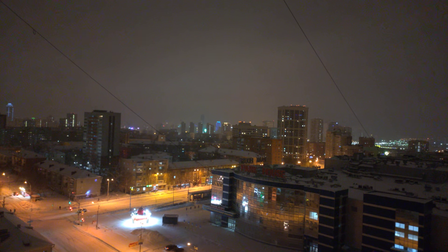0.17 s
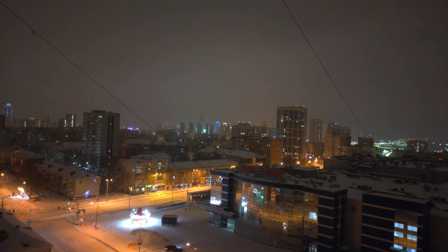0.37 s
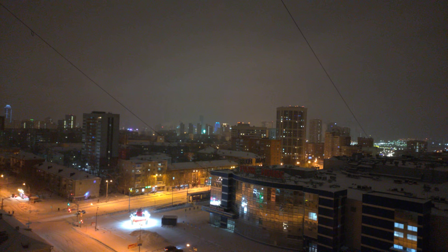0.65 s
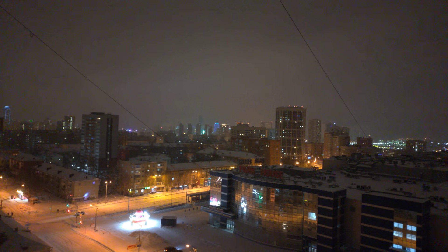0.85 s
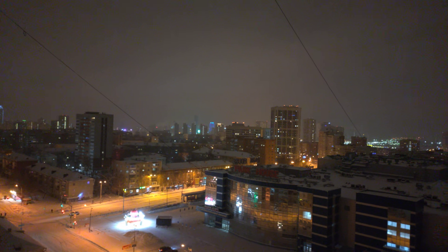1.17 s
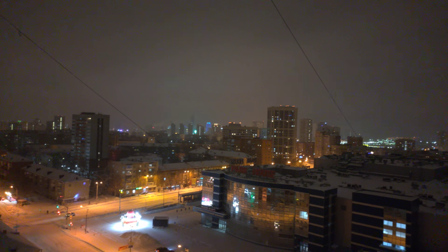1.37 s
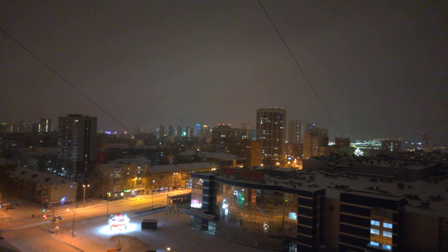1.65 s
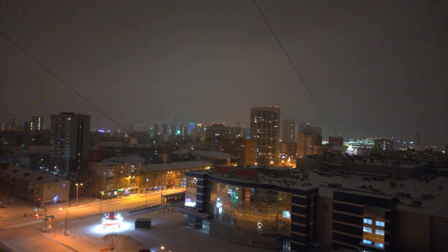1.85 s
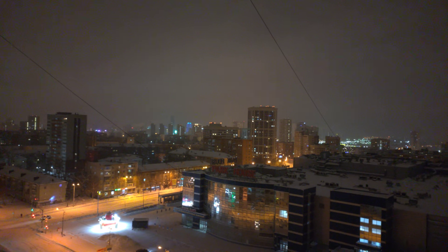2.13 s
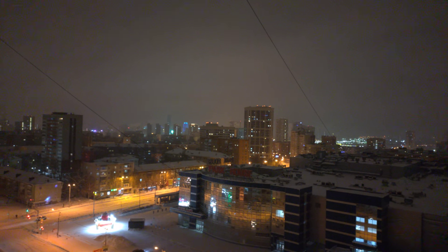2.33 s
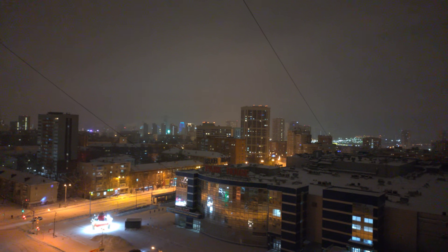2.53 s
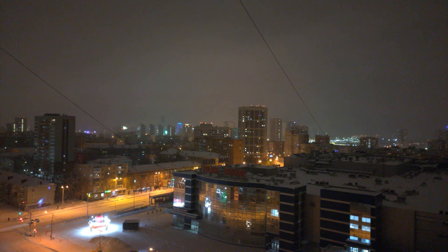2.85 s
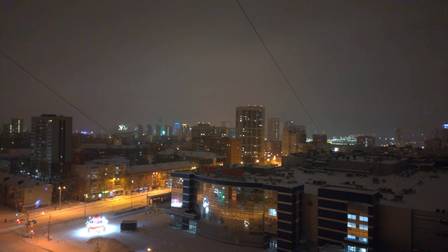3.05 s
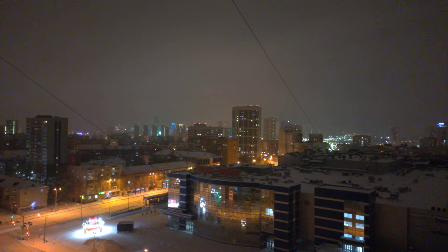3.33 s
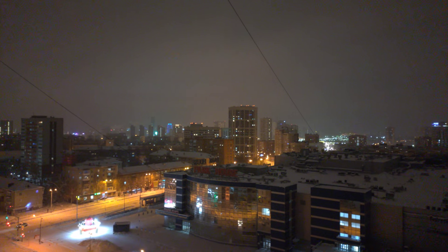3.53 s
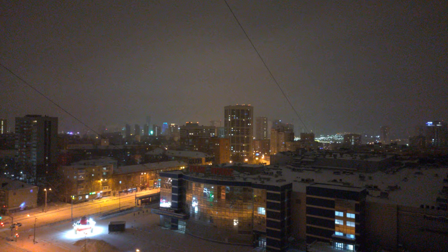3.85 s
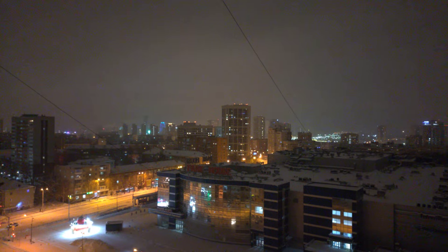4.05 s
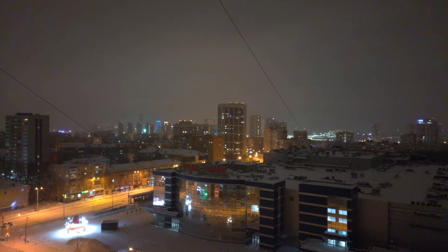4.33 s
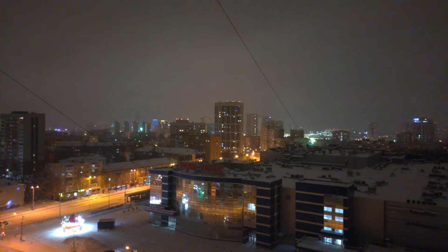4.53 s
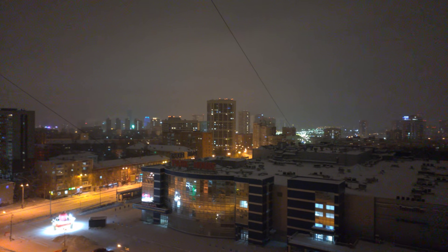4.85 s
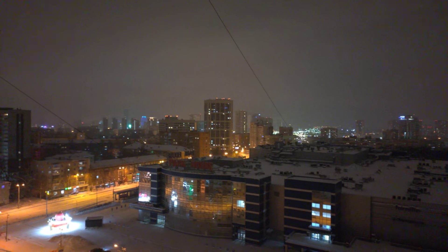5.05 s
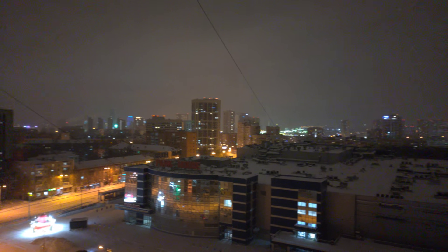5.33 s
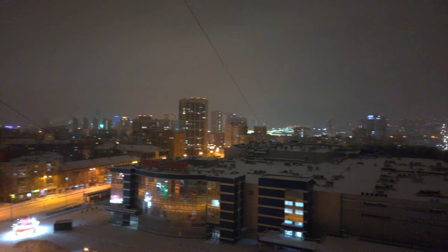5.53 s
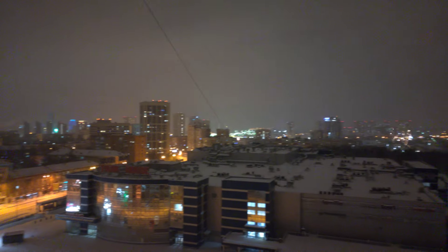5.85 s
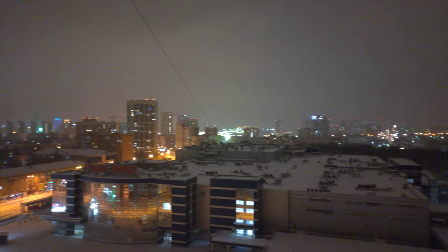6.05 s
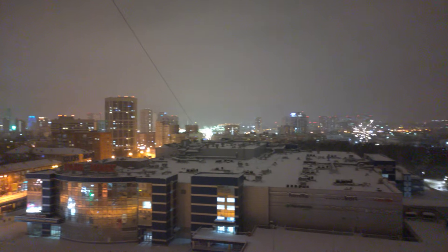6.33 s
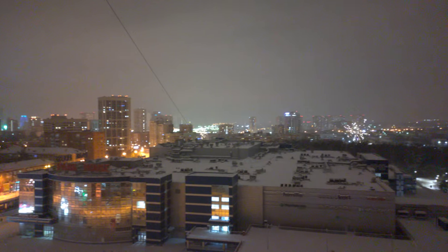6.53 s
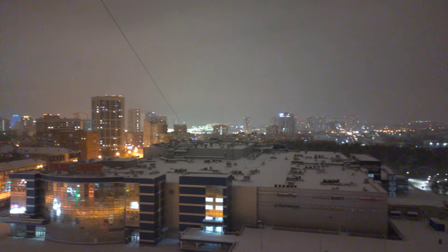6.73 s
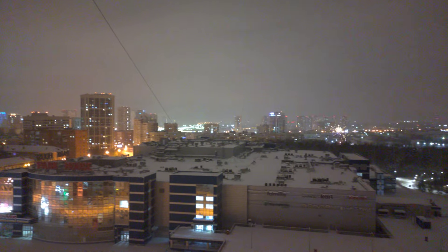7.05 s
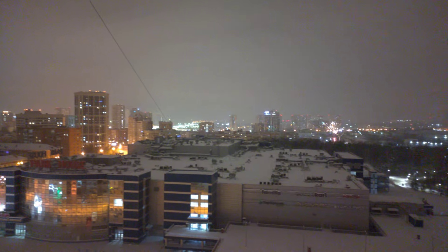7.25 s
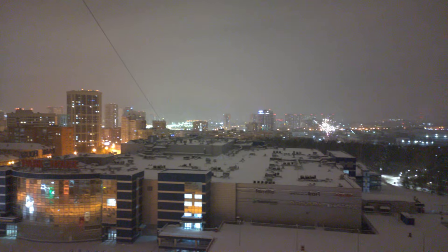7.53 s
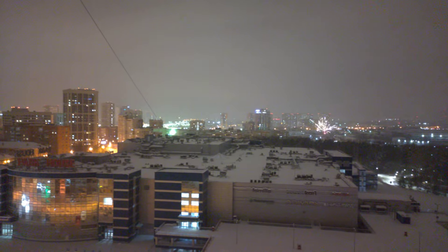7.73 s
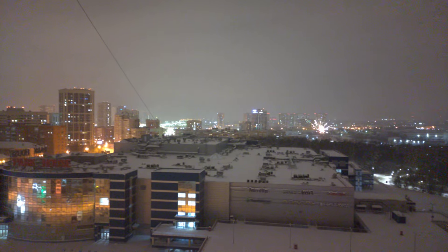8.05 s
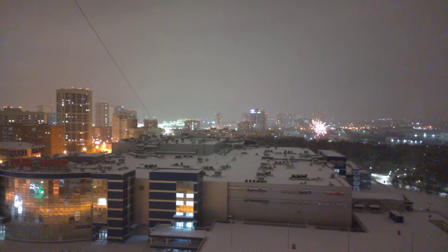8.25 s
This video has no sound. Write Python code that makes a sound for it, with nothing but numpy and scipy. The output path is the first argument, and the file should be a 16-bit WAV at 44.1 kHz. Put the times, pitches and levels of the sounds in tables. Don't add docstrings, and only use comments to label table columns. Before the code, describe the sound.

Irregular distant firework blasts over an open city, mostly muffled low-mid booms with short scattered echoes and a soft rolling tail. Sparse at first, with tiny handling-like rustles close by, they gain sharp rapid reports around three, four and a half and six seconds, then crowd together in deep thuds until the cut. Wide outdoor stereo from a small camera, treble dulled by distance, quiet street hiss underneath.

```python
import sys
import numpy as np
from scipy import signal
from scipy.fft import rfft, irfft, next_fast_len
from scipy.io import wavfile
from scipy.ndimage import uniform_filter1d

SR = 44100
rng = np.random.default_rng(int(sys.argv[2]) if len(sys.argv) > 2 else 0)


def amplitude_ratio(level_db):
    exponent = np.asarray(level_db, float) / 20
    return 10 ** exponent


def to_wav(sig):
    pcm = np.clip(np.atleast_2d(sig), -1, 1) * 32767
    pcm = np.round(pcm).astype(np.int16)
    wavfile.write(sys.argv[1], SR, pcm.T)


N = 369558
SIZE = next_fast_len(N + SR)
HZ = np.arange(SIZE // 2 + 1) * SR / SIZE

# start in seconds, level in dB, brightness in dB, last echo in dB.
SALVOS = [
    (2.6601, -10, -3.5, -1),
    (3.1151, -10, -5.5, 2.5),
    (4.626, -11, -0.5, -14.5),
    (5.8215, -10, -1.5, -2.5),
    (8.1271, -9, -2.5, -10.5),
]
# frequency in Hz, likeness from 0 to 1, left minus right in dB, left lead in radians.
PORT_PAIR = [(60, 1, 5.5, 0.55), (194, 0.98, 5.5, 0.42), (560, 0.63, 4.5, 0.64), (960, 0.12, 4.5, 4.15),
             (1250, 0.33, 3.5, 3.5), (1740, 0.6, 0.5, 4.3), (2040, 0.3, 0, 5.3), (3000, 0.12, 0.5, 8.7),
             (4860, 0, -2.5, 18.5), (8900, 0.5, -8, 20.5), (12200, 0.1, 5.5, 32)]


def on_hz(table, column=1):
    table = np.array(table)
    return np.interp(np.log(HZ + 1), np.log(table[:, 0]), table[:, column])


def on_time(table):
    s, *columns = np.transpose(table)
    return [np.interp(np.arange(N) / SR, s, c) for c in columns]


def unit(x):
    return x / np.sqrt(np.mean(x ** 2))


def filtered(x, gain):
    return irfft(gain * rfft(x, SIZE), SIZE)[..., :N]


def causal(gain):
    cepstrum = irfft(np.log(gain + 1e-4 * gain.max()), SIZE)
    cepstrum[1:SIZE // 2] *= 2
    cepstrum[SIZE // 2 + 1:] = 0
    return np.exp(rfft(cepstrum))


def decay(t, t60):
    return np.exp(-np.log(1000) * t / t60)


def swell(s, length, rise, fade):
    gain, i = np.zeros(N), int(max(s, 0) * SR)
    t = np.arange(min(N - i, int((length + 9 * fade) * SR))) / SR
    gain[i:i + len(t)] = np.minimum(t / rise, 1) * np.exp(-np.maximum(t - length, 0) / fade)
    return gain


def walk(rate):
    k = int(SR / rate)
    held = np.repeat(rng.standard_normal(N // k + 1), k)
    return 0.87 * uniform_filter1d(uniform_filter1d(held, k), k)[:N]


def pops(rate, scatter_db):
    hit, size, sign = rng.random((3, 2, N))
    height = amplitude_ratio(-scatter_db * np.log(size + .02))
    return unit((hit < rate / SR) * height * np.sign(sign - .5))


def grainy(pop_share, pop_rate, lump_rate):
    noise = rng.standard_normal((2, N)) + pop_share * pops(pop_rate, 3.0)
    return noise * amplitude_ratio(walk(lump_rate))


def bands():
    # frequency in Hz, level in dB per Hz.
    air_colour = [(25, -21), (90, -14.5), (180, -0.5), (300, -1), (600, -10), (900, -16.5), (1400, -20.5),
                  (1700, -25.5), (3050, -39), (3300, -43), (6500, -53), (8300, -50), (9300, -57),
                  (10200, -67.5), (15500, -74.5)]
    edges_hz = (450, 950, 4800)
    low, mid, high = (1 / (1 + (HZ / edge) ** 6) for edge in edges_hz)
    shares = [low, (1 - low) * mid, (1 - mid) * high, 1 - high]
    return amplitude_ratio(on_hz(air_colour)) * np.sqrt(shares)


def levels():
    # time in seconds, strength in dB, nearness in dB that lifts its top.
    barrage_levels = [(0, -32, 4.5), (.4, -30.5, -6.5), (.8, -29.5, 0.5), (1.2, -31.5, -2.5),
                      (1.9, -29.5, -7.5), (2.4, -30.5, 0.5), (2.9, -31, 0.5), (3.5, -29, 4),
                      (3.9, -29, 2.5), (4.3, -29, -1), (5, -29, 0.5), (5.5, -30, 1), (6.2, -30.5, 0),
                      (6.7, -27, 0), (7.1, -30, 0.5), (7.5, -31, -2), (8, -26.5, -6.5), (8.38, -28, 5)]
    # start in seconds, length in seconds, level in dB, brightness in dB.
    washes = [
        (0.802, 0.11, -26.5, 13.5),
        (2.359, 0.13, -21.5, 7),
        (3.189, 0.055, -21, 16.5),
        (3.586, 0.14, -19.5, -6),
        (4.782, 0.092, -11, 4.5),
        (4.928, 0.06, -21.5, 11),
        (5.244, 0.14, -14, 1.5),
        (5.99, 0.061, -15, -8),
        (6.662, 0.046, -12.5, 1.5),
    ]
    # start in seconds, length in seconds, level in dB, its share lower down in dB.
    rustles = [(0, 0.012, -68.5, 7), (0.043, 0.11, -68, 4.5), (0.446, 0.11, -70.5, 6.5),
               (0.165, .28, -86.5, 13.5), (.5, .42, -81.5, 13), (3.2, 0.17, -81, 9), (0.589, .04, -69, 2),
               (0.724, 0.056, -78.5, 11), (0.945, 0.007, -51.5, -4), (0.967, 0.11, -77, 9.5),
               (1.09, 0.047, -83.5, 17), (1.138, 0.21, -95.5, 26.5), (1.33, 1.97, -94.5, 23),
               (3.023, 0.052, -81, 11), (3.38, .52, -72, 0.5), (3.602, 0.11, -71, 0),
               (3.519, 0.014, -68.5, -1), (3.773, 0.083, -76.5, 6), (4.84, 0.021, -75.5, 12),
               (5.433, 0.14, -85, 17), (5.668, 0.022, -90, 23), (6.638, 0.011, -90.5, 23),
               (6.829, 0.01, -81.5, 16), (7.447, 0.013, -84.5, 15.5), (7.817, 0.0083, -79.5, 16.5)]
    db, near = on_time(barrage_levels)
    power = amplitude_ratio(2 * np.array([db, db - 21 + near, .5 * db - 58.5 + 0.25 * near, 0 * db - 91.5]))

    wash_db = (-17, -36, -62.5, -76.5)
    rise_s = 0.025
    glows = [(s + 0.044, rise_s, db, bright, 0.37) for s, db, bright, _ in SALVOS]
    for s, length, shot_db, bright, fade in glows + [(*row, .06) for row in washes]:
        wash = swell(s, length, rise_s, fade)
        lift = shot_db + np.array(wash_db) + bright * np.array([0, 1, 1, 1])
        power += (amplitude_ratio(lift)[:, None] * wash) ** 2

    ragged_db = 2.0 * walk(160)
    for s, length, top_db, low_db in rustles:
        rustle = amplitude_ratio(top_db + ragged_db * min(length / 0.059, 1))
        rustle = rustle * swell(s, length, 0.2 * min(length, .3), 0.03)
        power[-2:] += (rustle * amplitude_ratio(np.array([[low_db], [0]]))) ** 2
    return np.sqrt(power)


def barrage():
    boom, knock, crack, snap = bands()
    rumble_gain, roar_gain, crackle_gain, rustle_gain = levels()
    rumble = grainy(.6, 120, 14) * amplitude_ratio(1.5 * walk(35))
    roar, crackle, rustle = grainy(.3, 200, 12), grainy(.4, 300, 18), pops(2600, 3.9)
    roar_colour = crack * (1 + 0.13 * np.exp(-((HZ - 2600) / 700) ** 2))
    rustle_colour = 1 / (1 + (7500 / (HZ + 1)) ** 6) / (1 + (HZ / 9500) ** 5)
    rustle_colour *= 1 + 0.55 * np.exp(-((HZ - 8400) / 600) ** 2)
    out = rumble_gain * amplitude_ratio(2.5) * unit(filtered(rumble, boom + knock))
    out += roar_gain * amplitude_ratio(5.0) * unit(filtered(roar, roar_colour))
    out += crackle_gain * amplitude_ratio(5.0) * unit(filtered(crackle, snap))
    return out + rustle_gain * amplitude_ratio(5.5) * unit(filtered(rustle, rustle_colour))


def tyres():
    # time in seconds, level in dB.
    hiss_levels = [
        (0, -64),
        (.6, -58),
        (1.5, -68),
        (2.4, -68.5),
        (3.6, -61.5),
        (5, -66),
        (6.3, -66),
        (7.2, -71),
        (8.38, -68),
    ]
    low_hz, high_hz = 2300, 3180
    colour = 1 / np.sqrt((1 + (low_hz / (HZ + 1)) ** 6) * (1 + (HZ / high_hz) ** 40))
    return amplitude_ratio(on_time(hiss_levels)[0]) * unit(filtered(grainy(.4, 300, 18), colour))


def wind():
    # start in seconds, length in seconds, level in dB.
    sub_swells = [
        (2.554, 0.66, -45),
        (6.004, 0.65, -47.5),
        (6.98, 0.49, -58.5),
    ]
    slew_s = 0.13
    gain = amplitude_ratio(-55) + sum(amplitude_ratio(db) * swell(s, length, slew_s, slew_s) for s, length, db in sub_swells)
    noise = rng.standard_normal((2, N)) * amplitude_ratio(4.0 * walk(3.9))
    return gain * unit(filtered(noise, 1 / (1 + (HZ / 95) ** 4)))


def bangs():
    # start in seconds, boom in dB, knock in dB, crack in dB.
    reports = [(0.2705, -12, -14, -21), (1.827, -17.5, -20, -23.5), (2.272, -8.5, -9.5, -30),
               (2.321, -32.5, -21.5, -35), (2.841, -27.5, -28, -36), (2.889, -21, -29, -35),
               (3.096, -12, -14, -20.5), (2.061, -18.5, -25.5, -34.5), (3.524, -16, -41, -41),
               (3.639, -15.5, -36, -42), (4.728, -23.5, -9, -22), (5.274, -11.5, -31, -32),
               (5.538, -4, -10, -34.5), (5.585, -16, -13.5, -28), (6.14, -12, -10.5, -23.5),
               (6.574, -2.5, -10.5, -15), (6.832, -15, -26.5, -32), (7.395, -21, -51, -31.5),
               (7.563, -11.5, -12, -26.5), (8.182, -9, -31, -30)]
    # start in seconds, boom in dB, knock in dB, crack in dB.
    hidden = [
        (3.246, -12, -40, -31.5),
        (4.793, -26, -17.5, -18),
        (4.92, -23, -39, -25.5),
        (5.996, -25, -32, -25),
        (6.381, -9, -15.5, -17.5),
        (7.386, -10, -7, -18),
        (7.52, 2.5, -10, -17.5),
        (7.82, 1.5, -9, -16),
        (8.295, -23, -38, -31.5),
    ]
    # start in seconds, boom in dB, knock in dB.
    thumps = [(0.341, -21, -46), (0.439, -16.5, -26.5), (0.503, -29, -24), (0.616, -18, -27.5),
              (0.715, -17.5, -21.5), (1.19, -16.5, -31), (1.344, -21, -42), (1.627, -22.5, -30),
              (1.889, -13, -26), (1.944, -14.5, -29), (2.522, -20, -45), (3.416, -21.5, -24.5),
              (3.785, -16.5, -33.5), (4.503, -18, -40), (4.565, -18, -43), (4.595, -16, -22),
              (5.336, -19.5, -24), (7.076, -10, -20.5), (7.256, -5.5, -15), (7.495, -11, -22),
              (7.671, -21, -24.5), (7.719, -25.5, -44), (7.769, -23.5, -29), (7.963, -26.5, -29),
              (8.071, -12, -15), (8.21, -9, -31), (5.868, -10.5, -23)]
    # delay in seconds, boom in dB, knock in dB, crack in dB, snap in dB.
    paths = [
        (0, 3, -6, -7, -33),
        (0.0256, 4.5, -7.5, -6.5, -32),
        (0.049, 0.5, -4.5, -11, -19.5),
        (.074, 2, -28, -32.5, -37),
    ]
    path_t60_s = (.05, 0.12, 0.2, 0.21)
    path_blocked = (0, 0, 1, 1)
    rows = []
    for blocked, table in enumerate((reports, hidden)):
        for s, boom, knock, crack in table:
            snap = -56 + .5 * (crack + 25)
            rows.append((s, boom, knock, crack, snap, 0.18, blocked))
    for s, boom, knock in thumps:
        rows.append((s, boom, knock, boom - 31, boom - 51.5, 0.16, 0))
    for s, db, bright, last in SALVOS:
        for (late, boom, knock, crack, snap), t60, blocked in zip(paths, path_t60_s, path_blocked):
            up = db + last * (late == paths[-1][0])
            rows.append((s + late, up + boom, up + knock, db + crack + bright, db + snap + bright, t60, blocked))
    return rows


def blasts():
    shock_s = (.003, .001, .0002, .00005)
    rise_s = (.004, 0.00408, 0.00149, 0.0015)
    bright = (0.056, -0.13, -0.63, -1.32)
    scatter_db, fade_share = (-9, -2, -7, -5.5), (1, 0.55, 0.9, 1)
    town_db, town_t60_s = (-21, -19.5, -20.5, -18.5), 0.88
    build_s, blocked_db = 0.0077, -7
    out, walls = 0, pops(4000, 2.64)
    t, long = np.arange(SR // 4) / SR, np.arange(SR) / SR
    for band, colour in enumerate(bands()):
        shock = np.where(t < shock_s[band], 1 - 2 * t / shock_s[band], 0)
        response = causal(colour * (HZ / 1000 + 0.41) ** bright[band]) * rfft(shock, SIZE)
        pulse = irfft(response, SIZE)
        peak = np.abs(pulse).max()
        response = response / peak * amplitude_ratio(-1.5)
        energy = np.sqrt(np.sum(pulse ** 2)) / peak
        train, fronts = np.zeros((2, N + len(t))), np.zeros(N)
        for s, *db, t60, blocked in bangs():
            i, size = int((s + rise_s[band]) * SR), amplitude_ratio(min(db[band], -4))
            fade = decay(t, max(t60, .02) * fade_share[band]) + 0.15 * np.exp(-t / 0.00063)
            echoes = np.take(walls, np.arange(len(t)) + i + band * SR, axis=1, mode="wrap")
            echoes = echoes * fade * amplitude_ratio(scatter_db[band]) / energy
            echoes *= np.minimum(t / build_s, 1) ** blocked
            echoes[0, 0] = 0.67 * amplitude_ratio(blocked_db * blocked)
            train[:, i:i + len(t)] += size * echoes
            fronts[i] += size
        roll = rng.standard_normal((2, SR)) * decay(long, town_t60_s) * np.minimum(long / 0.03, 1)
        town = rfft(fronts, SIZE) * rfft(roll, SIZE) * amplitude_ratio(town_db[band]) / energy
        out = out + response * (rfft(train, SIZE) + town)
    return irfft(out, SIZE)[:, :N]


def patches(table, width, kick=3.96):
    out, t = np.zeros((2, N + SR // 4)), np.arange(SR // 4) / SR
    top_hz = .45 * SR
    for (s, hz, db, t60), noise in zip(table, rng.standard_normal((len(table), 2, SR // 4))):
        edges = [hz * (1 - width), min(hz * (1 + width), top_hz)]
        push = noise * decay(t, max(t60, .008))
        push[0, 0] = kick / np.sqrt(width * hz / 2000)
        burst = signal.sosfilt(signal.butter(2, edges, "band", fs=SR, output="sos"), push)
        dulling = signal.butter(2, min(2 * hz, top_hz), fs=SR, output="sos")
        burst = signal.sosfilt(dulling, burst)
        out[:, int(s * SR):int(s * SR) + len(t)] += amplitude_ratio(db) * burst / np.abs(burst).max()
    return out[:, :N]


def dull_booms():
    # start in seconds, peak in dB, centre in Hz, t60 in seconds.
    booms = [(0.268, -13, 193.5, 0.12), (0.346, -21, 233, 0.19), (0.44, -21.5, 191, 0.14),
             (0.503, -16, 237, 0.082), (0.675, -11.5, 301, 0.36), (0.721, -14, 203, 0.17),
             (1.188, -18.5, 184, 0.14), (1.343, -15, 280, 0.13), (1.795, -19, 179, 0.13),
             (1.827, -18.5, 193, 0.12), (1.892, -22, 321, 0.069), (2.274, -6, 367, 0.14),
             (2.521, -25.5, 205, 0.15), (2.686, -7.5, 256, 0.17), (2.922, -21, 250, 0.13),
             (3.141, -8.5, 236, 0.18), (3.415, -21, 194, 0.14), (3.502, -22, 195, 0.18),
             (3.607, -16.5, 189, 0.096), (3.643, -9.5, 251, 0.13), (3.739, -10, 312, 0.1),
             (3.804, -15.5, 284, 0.14), (4.165, -17, 312, 0.16), (4.458, -16.5, 190, 0.11),
             (4.506, -7.5, 253, 0.1), (4.654, -3, 341, 0.18), (4.756, -6.5, 346, 0.16),
             (5.035, -16.5, 251, 0.13), (5.107, -23.5, 270, 0.11), (5.206, -20.5, 242, 0.14),
             (5.336, -14, 229, 0.14), (5.542, -0.5, 294, 0.086), (5.592, -17, 220, 0.098),
             (5.848, -13.5, 313, 0.22), (6, -14.5, 181, 0.14), (6.139, -8.5, 380, 0.068),
             (6.385, -11.5, 353, 0.13), (6.575, -8, 304, 0.16), (6.885, -21, 240, 0.098),
             (7.078, -10, 182, 0.13), (7.262, -9, 229, 0.17), (7.503, -8.5, 307, 0.19),
             (7.673, -17, 307, 0.12), (7.723, -21.5, 212, 0.14), (7.77, -15.5, 230, 0.2),
             (7.826, -8.5, 257, 0.32), (8.076, -6.5, 241, 0.18), (8.154, -2.5, 294, 0.14)]
    return patches([(s, hz, db - 4, t60) for s, db, hz, t60 in booms], 0.18)


def shock_fronts():
    # start in seconds, centre in Hz, peak in dB, t60 in seconds.
    bare_fronts = [(.2713, 2780, -42, 0.02), (.9492, 10900, -36.5, .03), (1.8282, 3200, -44, .03),
                   (2.6609, 4000, -40, .015), (3.0964, 3000, -40, 0.023), (3.1158, 4000, -44, .015),
                   (3.1393, 4000, -37, .015), (4.6272, 5000, -36, .012), (4.651, 4000, -24, 0.013),
                   (4.678, 5500, -36.5, 0.018), (5.8227, 3000, -31.5, 0.012), (5.848, 4460, -34.5, 0.014),
                   (5.8745, 4500, -35.5, .02), (6.1424, 2500, -32, 0.025), (7.563, 4000, -34, 0.027),
                   (8.1289, 2800, -40, 0.01), (8.1529, 3180, -36, .02), (8.1808, 4000, -28.5, 0.024),
                   (8.1903, 3020, -23.5, 0.017)]
    return patches(bare_fronts, 0.31)


def street_rings():
    # start in seconds, centre in Hz, peak in dB, t60 in seconds.
    rings = [(.273, 960, -23, .15), (.272, 2000, -46, 0.11), (1.829, 1510, -30.5, .12),
             (1.829, 3800, -38, .1), (1.947, 588, -22.5, 0.062), (2.325, 710, -38, 0.13),
             (2.661, 2280, -33, 0.05), (2.7, 2300, -34, 0.23), (3.097, 980, -19, 0.3),
             (3.17, 331, -14, 0.32), (3.14, 1870, -34, 0.34), (3.25, 3700, -39, .15),
             (4.461, 326, -21, 0.08), (4.595, 600, -32, 0.067), (5.824, 298, -10, .09),
             (4.651, 1550, -28.5, 0.064), (4.7, 2300, -40, 0.34), (4.8, 2200, -40, 0.85),
             (5.544, 560, -10.5, 0.16), (5.589, 1900, -38, 0.19), (5.823, 1940, -30.5, 0.037),
             (5.849, 367, -5.5, 0.12), (5.865, 1970, -30, 0.28), (5.9, 1970, -31.5, 0.2),
             (6.143, 1040, -22.5, 0.16), (6.143, 1910, -24, 0.13), (6.386, 960, -18, 0.18),
             (6.39, 1550, -37, .15), (6.577, 1020, -25.5, 0.42), (6.578, 1650, -38, 0.17),
             (7.078, 182, -20.5, 0.35), (7.26, 201, -23, 0.076), (7.395, 1010, -17.5, 0.22),
             (7.397, 1490, -25, .15), (7.526, 963, -17, 0.16), (7.564, 2740, -30.5, 0.12),
             (7.575, 1000, -26, 0.32), (7.826, 960, -13.5, 0.11), (7.84, 1130, -22, 0.083),
             (7.9, 990, -32.5, 1), (8.129, 1670, -30, 0.058), (8.153, 1970, -34, 0.075),
             (8.153, 3530, -32, 0.31), (8.17, 1736, -24.5, 0.13), (8.19, 1960, -19, 0.051),
             (8.3, 1780, -31, 0.37)]
    return patches(rings, 0.11)


def wall_slaps():
    # start in seconds, centre in Hz, peak in dB, t60 in seconds.
    slaps = [(.2805, 2300, -39, .02), (.298, 497, -22, .03), (1.897, 590, -28, 0.034),
             (2.277, 620, -17.5, 0.029), (2.662, 2300, -34, 0.023), (2.706, 1500, -25.5, .03),
             (2.713, 3500, -38, .02), (4.652, 680, -15.5, 0.027), (5.8235, 1800, -23, 0.01),
             (5.8665, 2000, -22.5, .02), (5.8745, 3700, -28, .012), (5.8755, 1910, -24.5, 0.014),
             (2.715, 400, -14, 0.19), (6.479, 8400, -51, .04), (7.26, 615, -25, 0.032),
             (8.129, 1790, -34, .025), (8.154, 2100, -29, 0.027), (8.168, 3900, -34, .3),
             (1.233, 6500, -49, .04), (1.344, 6500, -51, .03), (5.535, 6000, -50, .06)]
    return patches(slaps, 0.27)


def late_echoes():
    # start in seconds, centre in Hz, peak in dB, t60 in seconds.
    front_echoes = [(.635, 354, -19.5, 0.22), (1.615, 388, -16.5, 0.14), (1.833, 2300, -33, .2),
                    (2.324, 910, -23, .06), (2.71, 415, -12, 0.16), (2.72, 2300, -34, 0.26),
                    (3.18, 2360, -32.5, 0.58), (3.25, 3300, -36, 0.22), (4.69, 700, -24, 0.084),
                    (4.75, 2300, -40, 0.36), (4.87, 2200, -40, 0.45), (5.125, 276, -24, 0.074),
                    (5.21, 275, -22.5, .3), (5.543, 650, -12, 0.068), (5.85, 602, -14, 0.053),
                    (5.88, 3600, -33.5, 0.23), (7.259, 660, -25.5, .08), (8.1825, 334, -9.5, 0.12),
                    (8.212, 303, -18, 0.12), (8.21, 1900, -32, 0.29)]
    return patches(front_echoes, 0.15)


def squeal():
    # start in seconds, length in seconds, level in dB.
    pushes = [
        (1.6, .4, -72),
        (2.02, .25, -68),
        (2.3, .2, -72),
        (2.5, .35, -68),
        (2.9, .4, -74),
        (3.3, .3, -77),
    ]
    slew_s, tone_hz = .12, 7100
    on = sum(amplitude_ratio(db) * swell(s, length, slew_s, slew_s) for s, length, db in pushes)
    turn = 2 * np.pi * np.cumsum(tone_hz + 20 + 22 * walk(20) + 45 * walk(400)) / SR
    beat = turn * .055
    tone = np.sin(turn)
    tone += amplitude_ratio(-5 + 5 * walk(4)) * np.sin(turn + beat)
    tone += amplitude_ratio(-9 + 3 * walk(5)) * np.sin(turn - beat)
    tone += amplitude_ratio(-9 + 2.5 * walk(6)) * np.sin(turn + 2 * beat)
    return on * amplitude_ratio(-2.5 + 3 * walk(150) + 3.5 * walk(35)) * tone


def star_spits():
    # start in seconds, centre in Hz, peak in dB, t60 in seconds.
    spits = [(2.7127, 8000, -43, 0.12), (2.724, 8900, -45.5, 0.11), (3.1672, 8100, -45.5, 0.25),
             (4.627, 8370, -48.5, 0.03), (4.6508, 8550, -44, 0.066), (4.678, 8130, -39.5, 0.092),
             (4.669, 8200, -44.5, 0.28), (4.6773, 9400, -41.5, 0.12), (4.685, 12500, -57.5, 0.32),
             (5.8476, 9060, -47.5, 0.11), (5.868, 7960, -40.5, .1), (5.8745, 8060, -39.5, 0.07),
             (8.1529, 9150, -54, 0.05), (8.169, 7400, -40.5, 0.21), (8.1808, 12440, -45.5, 0.12),
             (8.1898, 11900, -44, 0.044), (8.2015, 12600, -52.5, 0.036), (8.21, 11400, -53, .4)]
    return patches(spits, 0.33)


def deep_thuds():
    # start in seconds, level in dB.
    thuds = [
        (3.105, -40),
        (5.851, -32.5),
        (6.39, -24.5),
        (6.581, -24),
        (7.082, -35.5),
        (7.398, -30),
        (7.535, -23.5),
        (7.832, -25),
    ]
    hold_s = 0.012
    gain = sum(amplitude_ratio(db) * swell(s, hold_s, 0.0077, hold_s) for s, db in thuds)
    return gain * unit(np.sin(2 * np.pi * 105 * np.arange(N) / SR))


def whistles():
    # start in seconds, length in seconds, first pitch in Hz, last pitch in Hz, level in dB.
    rockets = [
        (6.45, 0.07, 8400, 8300, -69),
        (7.231, 0.062, 7100, 6960, -63),
        (7.708, 0.15, 3730, 4180, -80),
    ]
    out, flutter = np.zeros(N), walk(600)
    for s, length, from_hz, to_hz, db in rockets:
        i, share = int(s * SR), np.linspace(0, 1, int(length * SR))
        hz = from_hz + (to_hz - from_hz) * share + 420 * flutter[i:i + len(share)]
        tone = np.sin(2 * np.pi * np.cumsum(hz) / SR)
        out[i:i + len(share)] = amplitude_ratio(db) * np.sin(np.pi * share) * tone
    return out


def ports(sound, lead, blur):
    left, other = rfft(sound, SIZE)
    alike = np.clip(1 - blur * (1 - on_hz(PORT_PAIR, column=1)), 0, 1)
    half = amplitude_ratio(on_hz(PORT_PAIR, column=2) / 2)
    right = (alike * np.exp(-1j * lead) * left + np.sqrt(1 - alike ** 2) * other) / half
    return irfft([left * half, right], SIZE)[:, :N]


def scene():
    # time in seconds, share of the short lag from 0 to 1.
    swing = [
        (0, 0),
        (5.95, 0),
        (6.1, 1),
        (8.11, 1),
        (8.125, 0),
        (8.38, 0),
    ]
    long_lag_s, short_lag_s, blast_blur = 0.00045, 0.00014, 0.82
    turned, = on_time(swing)
    far = barrage() + tyres() + wind() + squeal() + deep_thuds() + whistles()
    shots = blasts() + dull_booms() + shock_fronts() + street_rings()
    shots = shots + wall_slaps() + late_echoes() + star_spits()
    out = ports(far, on_hz(PORT_PAIR, column=3), 0.94)
    out += ports(shots * (1 - turned), 2 * np.pi * HZ * long_lag_s, blast_blur)
    return out + ports(shots * turned, 2 * np.pi * HZ * short_lag_s, blast_blur)


def roll_off(x):
    return signal.sosfilt(signal.butter(12, 15790, fs=SR, output="sos"), x)


def record(dry):
    rounded = dry / (1 + (dry / .97) ** 4) ** .25
    return roll_off(rounded)


dry = scene()
out = record(dry)
to_wav(out)
```